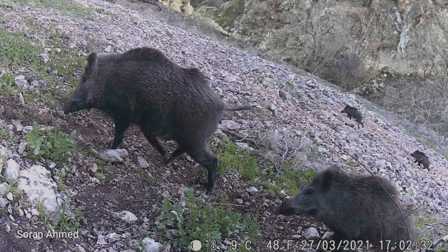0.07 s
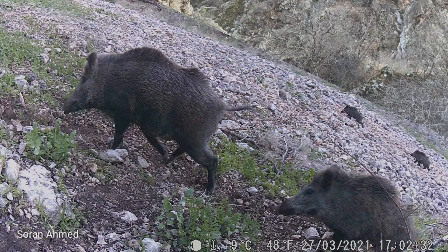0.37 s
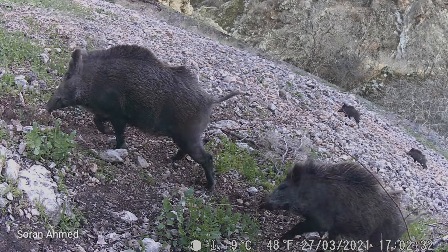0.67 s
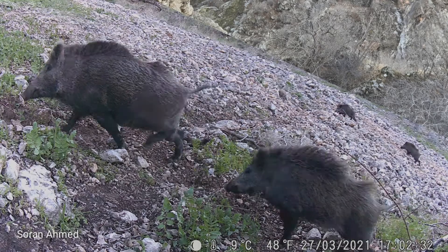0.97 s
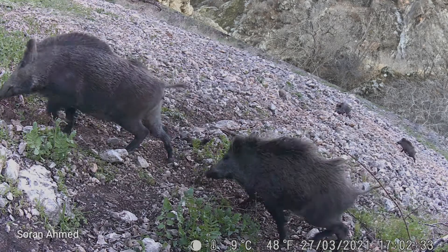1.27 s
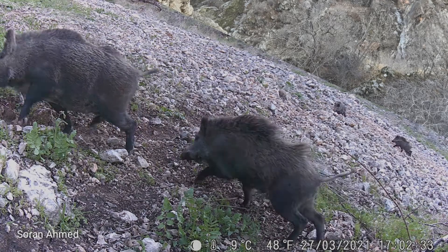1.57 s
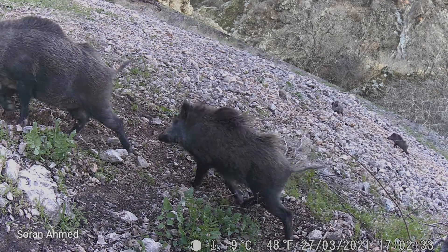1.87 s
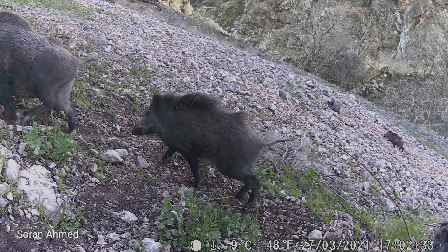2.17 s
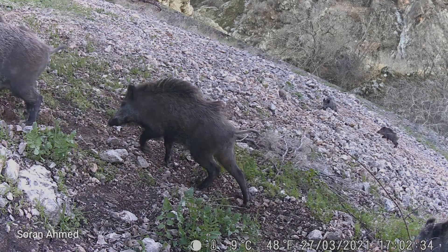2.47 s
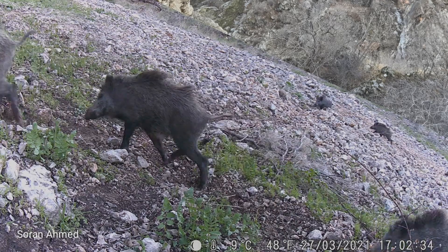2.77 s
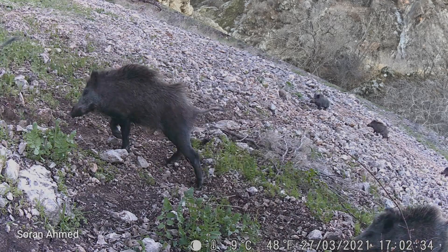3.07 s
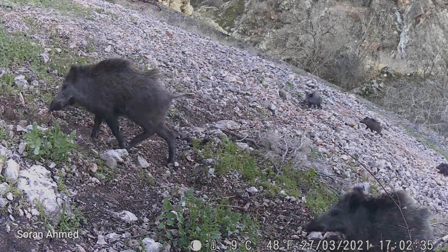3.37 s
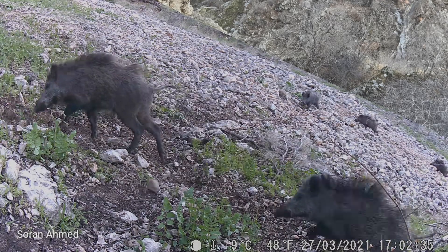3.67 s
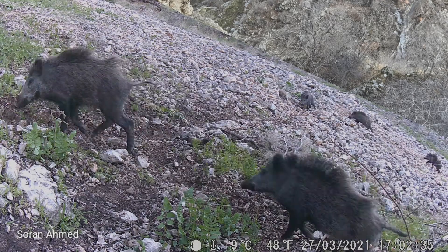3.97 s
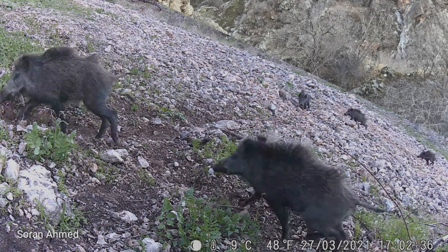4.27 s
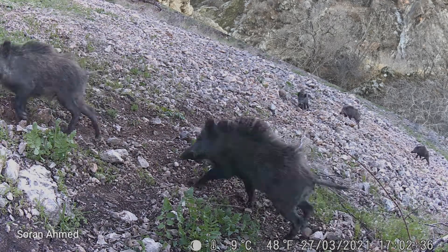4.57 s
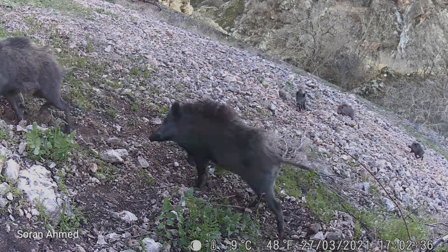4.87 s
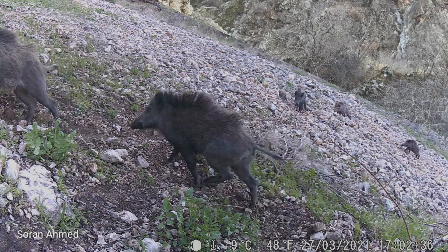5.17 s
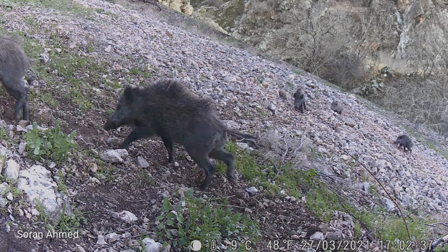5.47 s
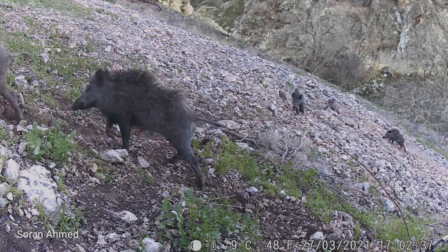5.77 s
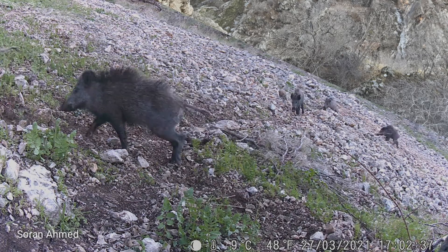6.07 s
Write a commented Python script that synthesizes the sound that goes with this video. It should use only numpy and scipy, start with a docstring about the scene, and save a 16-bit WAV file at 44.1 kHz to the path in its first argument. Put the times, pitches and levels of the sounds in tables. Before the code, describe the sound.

Faint hoof clicks and gravel crunches from passing boar, with one deep rattling growl, low wind and a steady soft hiss.

```python
"""A soft hiss and a low wind rumble come in as a trail camera wakes on a stony hillside.
Wild boar walk past: hooves click on stones and crunch through grit, with a few soft thuds underneath.
One animal gives a long, very low growl, slow flaps of the throat that break into a rattle.
The wind blows on the camera's case, whose resonances colour every step; its electronics add a thin whine."""
import sys
import numpy as np
from scipy.fft import rfft, irfft, next_fast_len
from scipy.io import wavfile
from scipy.ndimage import map_coordinates

SR = 44100
rng = np.random.default_rng(int(sys.argv[2]) if len(sys.argv) > 2 else 0)


def inscribe(sig):
    """Save sig as 16-bit PCM at rate SR to the path in sys.argv[1].

    A 1-D sig is mono; a 2-D sig holds one channel per row.
    Samples are clipped to [-1, 1] before scaling.
    """
    pcm = np.round(np.clip(np.atleast_2d(sig).T, -1, 1) * 32767)
    wavfile.write(sys.argv[1], SR, pcm.astype(np.int16))


N = 278271


def amp(db):
    """Decibels to gain."""
    return 10 ** (np.asarray(db) / 20)


def unit(x):
    """Scale to rms 1."""
    return x / np.sqrt(np.mean(x ** 2) + 1e-20)


def clock():
    """The time of every sample, in seconds."""
    return np.arange(N) / SR


def curves(rows):
    """An automation curve for each column after the time."""
    times, *columns = np.transpose(rows)
    return [np.interp(clock(), times, column) for column in columns]


def swell(centre_s, length_s):
    """A bell-shaped rise and fall."""
    return np.exp(-(2 * (clock() - centre_s) / length_s) ** 2)


def wobble(rate_hz):
    """Smooth random modulation through rate_hz points a second."""
    knots = rng.standard_normal(int(N * rate_hz / SR) + 4)
    return map_coordinates(knots, [clock() * rate_hz], mode="nearest")


def eq_db(eq, hz):
    """Read an EQ curve of (freq_hz, gain_db) points on a log axis."""
    freqs, gains = np.transpose(eq)
    return np.interp(np.log(hz + 1), np.log(freqs + 1), gains)


def filtered(x, response):
    """Pass x through a frequency response."""
    size = next_fast_len(N + SR // 2)
    return irfft(rfft(x, size) * response(np.fft.rfftfreq(size, 1 / SR)), size)[:N]


def coloured(x, eq):
    """x shaped by an EQ curve, at rms 1."""
    return unit(filtered(x, lambda hz: amp(eq_db(eq, hz))))


def narrow_noise(centre_hz, width_hz):
    """Noise of rms 1 ringing in one resonance."""
    return unit(filtered(rng.standard_normal(N), lambda hz: 1 / (1 + ((hz - centre_hz) / width_hz) ** 2)))


def grains(per_s, spread_db):
    """Tiny impacts of random size at random moments."""
    impacts = (rng.random(N) < per_s / SR) * rng.standard_normal(N)
    return impacts * amp(spread_db * rng.standard_normal(N))


def add(track, start_s, sound):
    """Mix a short sound into the track."""
    part = track[round(start_s * SR):][:len(sound)]
    part += sound[:len(part)]


# Colour of the camera's hiss: freq_hz, gain_db
HISS_EQ = [(180, -12.5), (300, 1), (452, -7), (532, -8.5), (653, -8.5), (738, -10.5), (905, -10.5),
           (1260, -11.5), (1560, -15.5), (2320, -14), (3260, -19.5), (3590, -23.5), (4840, -26),
           (6900, -20), (7800, -28.5), (10100, -67.5), (17200, -120)]


def electronics(hiss_db=-69, whine_db=-86, whine_hz=6797):
    """The camera's own steady hiss, and a thin whine with a noisy halo."""
    hiss = coloured(rng.standard_normal(N), HISS_EQ)
    whine = np.sqrt(2) * np.sin(2 * np.pi * whine_hz * clock())
    halo = 0.46 * narrow_noise(whine_hz, width_hz=49)
    return amp(hiss_db) * hiss + amp(whine_db) * (whine + halo)


# Colour of the wind rumble: freq_hz, gain_db
RUMBLE_EQ = [(8.8, -25), (15, -2), (27, -0.5), (54, -3.5), (91, -4), (103, -5), (128, -12.5), (157, -14),
             (210, -21), (341, -34.5), (438, -46.5), (500, -36), (650, -76), (1100, -120)]
# Resonances of the case humming in the air: centre_hz, width_hz, level_db
CASE_MODES = [(526.1, 3.8, -82), (743.3, 12, -83), (837.4, 6.6, -87.5), (1273, 37, -86), (3637, 180, -82.5)]


def wind(rumble_db=-50, drift_db=0.99):
    """Light wind rumbles on the case and stirs its resonances."""
    rumble = amp(rumble_db + drift_db * wobble(4.2)) * coloured(rng.standard_normal(N), RUMBLE_EQ)
    hum = sum(amp(db) * narrow_noise(hz, width_hz) for hz, width_hz, db in CASE_MODES)
    return rumble + hum


# Low thuds and swells: centre_s, level_db, length_s
LOW_THUDS = [(0.612, -47, 0.15), (1.007, -39, 0.031), (3.19, -41, 0.15), (3.686, -37, 0.0068),
             (3.759, -36.5, 0.042)]


def thuds(boom_hz=89):
    """Soft low swells that boom at one pitch."""
    return sum(amp(db) * swell(centre_s, length_s) * np.sin(2 * np.pi * (boom_hz * clock() + rng.random()))
               for centre_s, db, length_s in LOW_THUDS)


# Bright colour of grit and pebbles: freq_hz, gain_db
GRIT_EQ = [(2400, -25), (3200, -23), (3560, 0.5), (3850, -5.5), (4300, -14.5), (5000, -25.5), (6200, -20),
           (7500, -33.5)]
# Darker colour of coarse gravel: freq_hz, gain_db
GRAVEL_EQ = [(600, -34), (950, -3), (1250, 8.5), (1550, -19), (1900, -1), (2300, 2), (2900, -10),
             (4000, -34.5)]
# Hooves sliding in loose ground: centre_s, length_s, grit_gain_db, gravel_gain_db
HOOF_SCUFFS = [(0.544, 0.075, -72.5, -79), (0.82, 0.041, -74, -71.5), (1.006, 0.11, -71, -73.5),
               (1.68, 0.35, -74, -78), (2.618, 0.11, -72.5, -72.5), (2.783, 0.32, -76, -77.5),
               (3.053, 0.18, -67.5, -71.5), (3.68, .04, -70, -73), (4.061, 0.039, -61.5, -67.5),
               (4.632, .06, -71.5, -75), (4.798, 0.028, -65, -69), (5.56, .33, -75.5, -70.5)]


def loose_ground(grit_trim_db=-1, pebbles_db=-82, pebbles_per_s=45, roll_s=0.0039):
    """Grit and gravel shift under sliding hooves; stray pebbles scrape softly all the while."""
    grit_envelope = sum(amp(db) * swell(s, length_s) for s, length_s, db, _ in HOOF_SCUFFS)
    gravel_envelope = sum(amp(db) * swell(s, length_s) for s, length_s, _, db in HOOF_SCUFFS)
    grit = amp(grit_trim_db) * grit_envelope * coloured(grains(per_s=4000, spread_db=3.5), GRIT_EQ)
    gravel = gravel_envelope * coloured(grains(per_s=3600, spread_db=0.5), GRAVEL_EQ)
    nudges = (rng.random(N) < pebbles_per_s / SR) * rng.uniform(0.4, 1, N)
    # each pebble moves for some milliseconds
    rolling = filtered(nudges, lambda hz: 1 / (1 + 2j * np.pi * hz * roll_s) ** 2)
    pebbles = amp(pebbles_db) * unit(rolling * coloured(rng.standard_normal(N), GRIT_EQ))
    return grit + gravel + pebbles


def stone_db(hz, pitch_hz, above_db_per_oct=-18.5, below_db_per_oct=-8.5):
    """A stone's sound falls away on either side of its pitch."""
    octaves = np.log2(hz / pitch_hz)
    return abs(octaves) * (above_db_per_oct if octaves > 0 else below_db_per_oct)


# Resonances that every contact rings: freq_hz, gain_db, t60_s
CONTACT_MODES = [(732, -17.5, 0.0093), (1064, -4.5, 0.026), (1250, -1.5, 0.039), (1797, -8, 0.0049),
                 (2232, -4.5, 0.016), (2540, -8.5, 0.027), (3586, -1.5, 0.026), (3780, -7, 0.013)]
# Colour of the dry crack: freq_hz, gain_db
CRACK_EQ = [(500, -20.5), (2500, -4.5), (4500, 0.5), (6100, 0.5), (7000, -11.5), (9000, -26)]
# Hooves striking stones, big stones low and chips high: start_s, gain_db, pitch_hz
HOOF_STRIKES = [(0.550, -55, 1200), (0.622, -56, 4000), (0.8081, -51.5, 3300), (0.9492, -48, 3400),
                (0.9598, -50, 1150), (0.9822, -41.5, 3900), (1.217, -56.5, 3700), (1.3314, -56.5, 3700),
                (1.542, -55, 3700), (1.663, -50.5, 4000), (1.702, -55.5, 1150), (1.721, -51, 1150),
                (1.7652, -52, 3000), (2.1796, -56.5, 3500), (2.265, -55, 3900), (2.3775, -56.5, 3700),
                (2.5968, -49, 3500), (2.851, -52.5, 2300), (2.8684, -54.5, 3500), (2.9577, -57, 6000),
                (3.037, -46.5, 6000), (3.383, -53, 1200), (3.4158, -39, 1950), (3.673, -56.5, 3500),
                (3.742, -53.5, 3800), (3.996, -50.5, 3500), (3.9973, -45.5, 1150), (4.0472, -53, 3400),
                (4.2742, -56.5, 3480), (4.499, -53.5, 3300), (4.558, -51.5, 3500), (4.645, -48, 1140),
                (4.649, -39.5, 1150), (5.309, -56.5, 3500), (5.558, -53.5, 1200), (5.646, -53.5, 4000),
                (5.7394, -52.5, 3000)]


def hoof_clicks(ring_db=-2, crack_db=-12, thump_db=-15, crack_hz=5500, thump_hz=1010,
                attack_s=0.001, detune=0.027, roughness=0.053, settle_s=0.012, settle_db=-15.5):
    """Hoof on stone: a short ring, a little different every time, with a dry crack and a dull thump."""
    rings, cracks, thumps = np.zeros((3, N))
    t = np.arange(SR // 16) / SR
    rise = 1 - np.exp(-(t / attack_s) ** 2)

    def envelope(t60_s):
        shape = rise * amp(-60 * t / t60_s)
        return shape / shape.max()

    def burst(t60_s):
        return envelope(t60_s) * rng.standard_normal(len(t))

    # each stone tips back and touches again, softer
    contacts = [(start_s + touch * settle_s, db + touch * settle_db, pitch_hz)
                for start_s, db, pitch_hz in HOOF_STRIKES for touch in range(2)]
    for start_s, db, pitch_hz in contacts:
        for hz, mode_db, t60_s in CONTACT_MODES:
            # crumbling stone blurs the ring
            grind = roughness * np.cumsum(rng.standard_normal(len(t))) * hz / 3600
            detuned_hz = hz * (1 + detune * rng.normal())
            ring = envelope(t60_s) * np.sin(2 * np.pi * (detuned_hz * t + rng.random()) + grind)
            add(rings, start_s, amp(db + ring_db + mode_db + stone_db(hz, pitch_hz)) * ring)
        add(cracks, start_s, amp(db + crack_db + stone_db(crack_hz, pitch_hz)) * burst(t60_s=0.04))
        add(thumps, start_s, amp(db + thump_db + stone_db(thump_hz, pitch_hz)) * burst(t60_s=0.014))
    cracks = filtered(cracks, lambda hz: amp(eq_db(CRACK_EQ, hz)))
    thumps = filtered(thumps, lambda hz: 1 / (1 + (hz / 1700) ** 2))
    return rings + 2 * (cracks + thumps)


# Pitch and level automation of the growl: time_s, pitch_hz, level_db
GROWL_CONTOUR = [(1.55, 34.0, -42.5), (1.62, 41.49, -31), (1.814, 54.61, -28), (1.976, 56.96, -32.5),
                 (2.04, 68.4, -32), (2.136, 68.2, -30), (2.248, 87.26, -30), (2.318, 74.9, -31),
                 (2.404, 65.85, -34), (2.526, 60.85, -36), (2.59, 71.56, -36), (2.658, 59.9, -32.5),
                 (2.7, 40.7, -39)]
# Colour of the throat: freq_hz, gain_db
THROAT_EQ = [(30, -17.5), (70, -2.5), (130, 1.5), (200, -10.5), (280, -20.5), (350, -28.5), (430, -25.5),
             (650, -47), (1200, -77)]
# Where the growl breaks into a rattle: centre_s, length_s, rasp_boost_db
GROWL_RATTLES = [(1.544, 0.13, 13), (2.07, 0.19, 11), (2.262, 0.23, 9.5), (2.62, 0.2, 8.5)]


def growl(overtone_db=-7, slope_db_per_oct=-5, purity_db_per_oct=-9, pure_above_hz=55, rasp_db=-20,
          jitter=0.0083, shimmer_db=0.83, flutter_db=1.25, smear_rad=0.17):
    """Slow flaps of the throat: a strong fundamental, with throat-coloured overtones and a pulsing rasp."""
    pitch_hz, level_db = curves(GROWL_CONTOUR)
    phase = 2 * np.pi * np.cumsum(pitch_hz * (1 + jitter * wobble(50))) / SR
    # for a moment the flaps turn symmetric and lose their even overtones
    hollow_db = -19 * swell(centre_s=2.363, length_s=0.42)
    # faster flaps sound purer
    richness_db = overtone_db + purity_db_per_oct * np.log2(np.maximum(pitch_hz / pure_above_hz, 1))
    tone = np.sin(phase)
    for harmonic in range(2, 10):
        db = richness_db + slope_db_per_oct * np.log2(harmonic / 2) + eq_db(THROAT_EQ, harmonic * pitch_hz)
        if harmonic % 2 == 0:
            db += hollow_db
        tone += amp(db + flutter_db * wobble(8.39)) * np.sin(harmonic * phase + smear_rad * wobble(25))
    rattle_db = sum(db * swell(centre_s, length_s) for centre_s, length_s, db in GROWL_RATTLES)
    pulsing_noise = rng.standard_normal(N) * (1 + 0.73 * np.cos(phase))
    rasp = amp(rasp_db + rattle_db) * coloured(pulsing_noise, THROAT_EQ)
    voice = np.sqrt(2) * tone * amp(shimmer_db * wobble(29.97))
    gate = np.interp(clock(), [1.49, 1.57, 2.67, 2.72], [0, 1, 1, 0])
    return gate * amp(level_db) * (voice + rasp)


def scene():
    """The boar over a bed of wind, in mono."""
    return (growl() + hoof_clicks() + loose_ground() + thuds() + wind())[None]


def record(dry, lowpass_hz=7250, floor_db=-89, top_hz=15500, wake_s=0.385, fade_in_s=0.053):
    """The camera adds its own noise, cuts the treble steeply, and fades in as it wakes."""
    sound = filtered(dry[0] + electronics(), lambda hz: 1 / np.sqrt(1 + (hz / lowpass_hz) ** 40))
    sound += amp(floor_db) * rng.standard_normal(N)
    awake = np.clip((clock() - wake_s) / fade_in_s, 0, 1)
    return filtered(sound * awake, lambda hz: hz < top_hz)[None]


dry = scene()
out = record(dry)
inscribe(out)
```